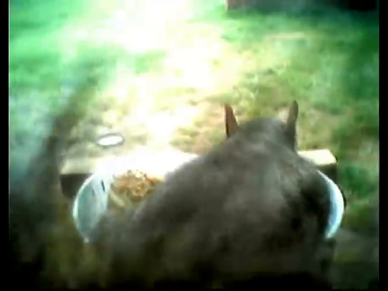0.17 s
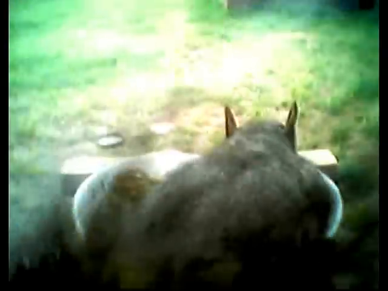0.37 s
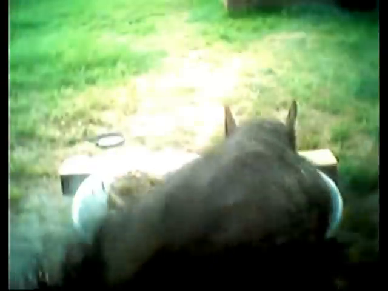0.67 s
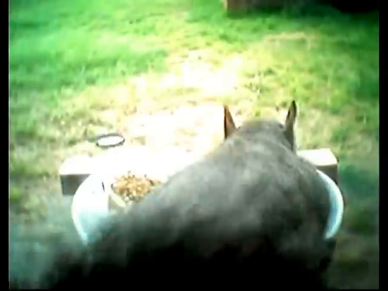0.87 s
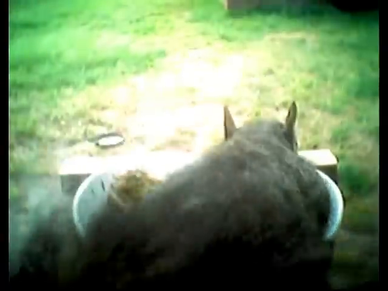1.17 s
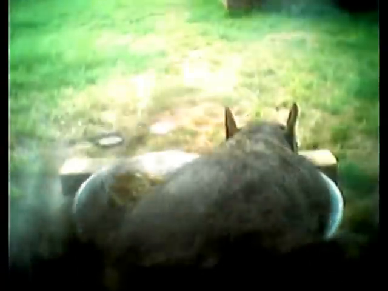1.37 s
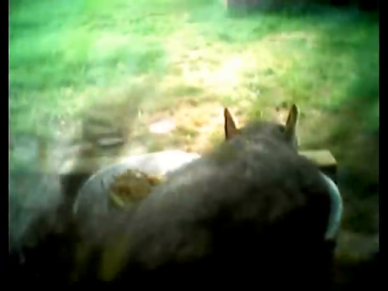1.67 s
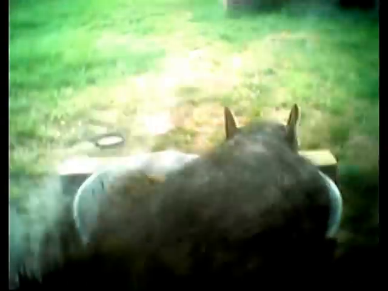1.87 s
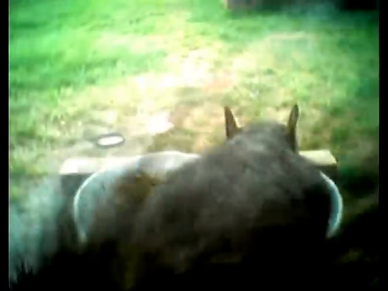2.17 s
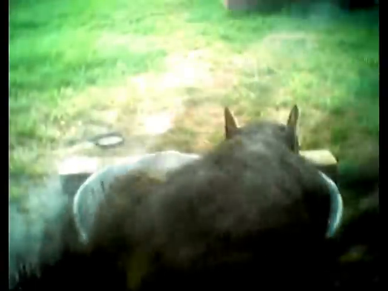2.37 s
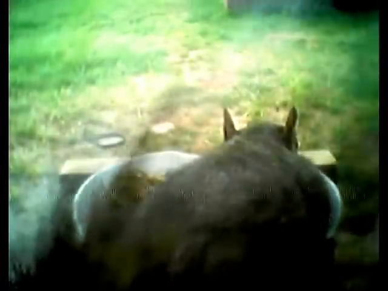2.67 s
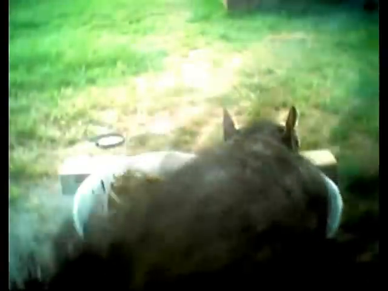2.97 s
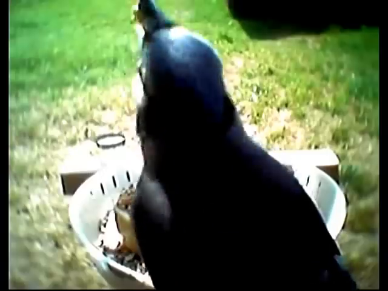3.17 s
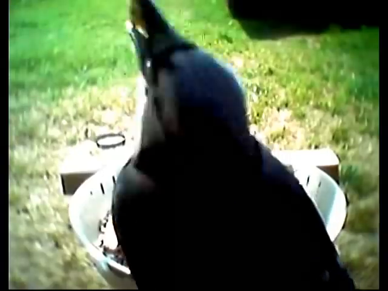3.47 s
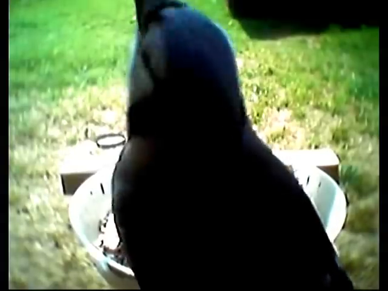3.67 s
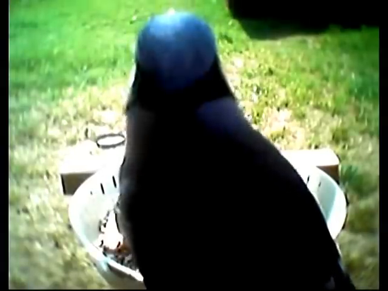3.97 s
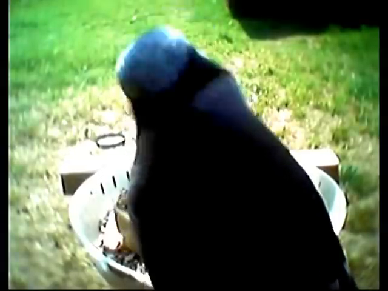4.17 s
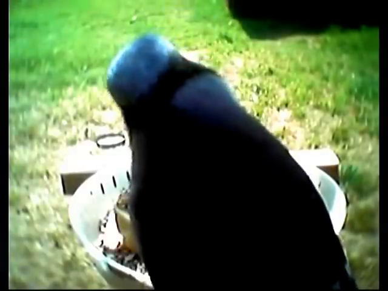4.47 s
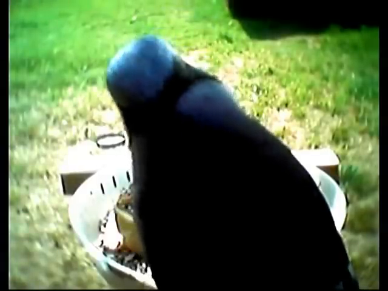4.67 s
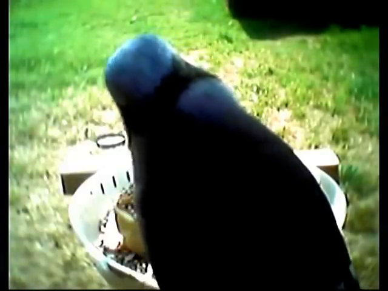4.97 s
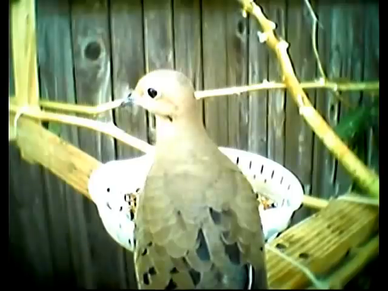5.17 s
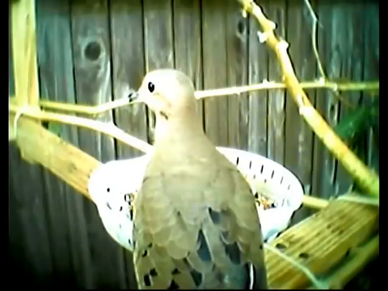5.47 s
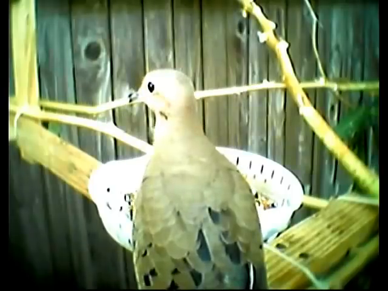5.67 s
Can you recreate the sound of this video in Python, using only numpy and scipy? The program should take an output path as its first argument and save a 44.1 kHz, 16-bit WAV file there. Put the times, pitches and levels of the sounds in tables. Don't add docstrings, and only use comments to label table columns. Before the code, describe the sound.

Outdoors in a yard, a songbird whistles falling-then-rising pairs about three times a second, with faint peeps behind it. After a tiny silent gap a nearer bird calls loudly, overloading the cheap microphone and echoing off walls. A last cut leaves only dim peeps. Birds and airy wash sit left; buzz and hiss sit right.

```python
import sys
import numpy as np
from scipy import signal
from scipy.fft import rfft, irfft
from scipy.io import wavfile
from scipy.ndimage import uniform_filter1d

SR = 44100
rng = np.random.default_rng(int(sys.argv[2]) if len(sys.argv) > 2 else 0)


def invert_db(x):
    u = np.asarray(x, float) / 20
    return 10 ** u


def dump_mix(stems):
    frames = np.atleast_2d(stems).T
    limited = np.clip(frames, -1, 1)
    pcm = np.round(limited * 32767).astype(np.int16)
    wavfile.write(sys.argv[1], SR, pcm)


N = 256220
T = np.arange(N) / SR

# start_s, end_s, fade_s, wash_db, rumble_db, hiss_db
SHOTS = [
    (-.1, 3.05, .012, -46, -59.5, -60.5),
    (3.098, 5.158, 0.019, -46.5, -59.5, -61),
    (5.203, 5.6, 0.029, -46.5, -48.5, -70),
]


def unit(x):
    return x / np.sqrt(np.mean(x ** 2))


def colour(x, shape):
    hz, db = np.transpose(shape)
    f = np.maximum(np.arange(len(x) // 2 + 1) * SR / len(x), 1)
    gain = invert_db(np.interp(np.log(f), np.log(hz), db))
    return irfft(rfft(x) * gain, len(x))


def walk(rate_hz):
    hold = int(SR / rate_hz)
    levels = np.repeat(rng.standard_normal(N // 20), hold)[:N]
    return unit(uniform_filter1d(uniform_filter1d(levels, hold), hold))


def shot_gate(start_s, end_s, fade_s):
    return np.clip(np.minimum(T - start_s, end_s - T) / fade_s + .5, 0, 1) ** 2


def flickering_noise(shape, flicker_db):
    out, noise = 0, colour(rng.standard_normal(N), shape)
    for octave in range(10):
        hz = 25 * 2. ** octave
        band = [(hz / 2, -40), (hz / 1.3, -2), (hz * 1.3, -2), (hz * 2, -40)]
        out = out + invert_db(flicker_db * walk(12)) * colour(noise, band)
    return unit(out)


def distant_wash():
    # pitch_hz, level_db (per Hz)
    wash_colour = [(30, -7), (90, -1.5), (200, -3), (400, 0), (800, -2.5), (1600, -6), (2200, 1),
                   (2700, -8), (3400, -18), (4000, -21.5), (5500, -25), (7500, -27), (11000, -29.5)]
    return flickering_noise(wash_colour, 1.36)


def low_rumble():
    rumble_colour = [(120, -22.5), (250, 9.5), (360, -4), (480, 8), (700, -38)]
    return unit(colour(rng.standard_normal(N), rumble_colour))


def input_hiss():
    # pitch_hz, level_db (per Hz)
    hiss_colour = [(25, -2), (90, -5.5), (200, -3.5), (400, 0.5), (800, -3), (2200, -17), (4000, -14),
                   (7500, -24), (11000, -24.5)]
    return flickering_noise(hiss_colour, 1.4)


def picture_buzz(field, first_s):
    field_hz = 59.94
    share, millivolts = np.transpose(field)
    wave = np.interp((T - first_s) * field_hz % 1, share, millivolts) / 1000
    dulled = colour(wave - wave.mean(), [(2000, 0), (5000, -5.0), (11000, -5.5)])
    return dulled * invert_db(1.0 * walk(3))


def signal_dropouts():
    # start_s, step_size (full scale = 1), length_s, channel (0 left, 1 right)
    dropouts = [
        (4.5469, -.16, .0018, 0),
        (4.5148, .022, .002, 1),
        (1.66, .004, .0003, 1),
    ]
    out, roughness = np.zeros((2, N)), 1 + 0.27 * rng.standard_normal(N)
    for s, size, length, channel in dropouts:
        slide_back = np.clip(1.6 - 1.46 * (T - s) / length, 0, 1)
        out[channel] += size * roughness * (T > s) * slide_back
    return out


def beak_ticks():
    # start_s, peak_db, pitch_hz
    knocks = [
        (1.099, -40, 2010),
        (1.812, -24, 2050),
        (1.877, -25, 2200),
        (3.721, -23, 2340),
        (5.289, -35.5, 1500),
    ]
    out = np.zeros(N)
    for s, db, hz in knocks:
        t = np.maximum(T - s, 0)
        out += invert_db(db) * np.exp(-t / 0.0011) * np.sin(2 * np.pi * hz * t)
    return out


def yard(x, slaps, early_db, early_t60, late_db, late_t60):
    # pitch_hz, level_db
    echo_colour = [(1400, -15), (2200, -2.5), (2700, 2), (3300, -3.5), (4500, -15.5)]
    t, noise = T[:SR], rng.standard_normal((2, SR))
    sparse = noise[0] * (rng.random(SR) < .01) * (t > .006) * invert_db(-60 * t / early_t60)
    tail = noise[1] * np.minimum(t / 0.03, 1) * invert_db(-60 * t / late_t60)
    response = (invert_db(early_db) * unit(sparse) + invert_db(late_db) * unit(tail)) / np.sqrt(SR)
    for s, db in slaps:
        response[int(s * SR)] += invert_db(db)
    return x + colour(signal.fftconvolve(x, response)[:N], echo_colour)


def echo_cancelling():
    # centre_s, depth_db
    dips = [(.064, -14), (0.0847, -10), (.383, -9), (.392, -7), (.754, -12), (1.117, -10), (1.4727, -16),
            (1.498, -12), (1.826, -25), (1.8468, -17), (2.21, -20), (2.5843, -27), (2.888, -24),
            (3.11, -20), (3.142, -18), (3.2166, -10), (3.2606, -18), (3.2677, -18), (3.8518, -17),
            (3.927, -14), (3.991, -16), (4.04, -9), (4.325, -11.5), (4.4006, -13.5), (4.5062, -15),
            (4.527, -8)]
    gain, half_width_s = np.ones(N), .002
    for s, db in dips:
        gain *= 1 - (1 - invert_db(db)) * np.exp(-((T - s) / half_width_s) ** 2)
    return gain


def whistle(notes, edge_s, wobble, flutter_db):
    out, quaver, flutter = np.zeros(N), 1 + wobble * walk(150), invert_db(flutter_db * walk(110))
    for note in notes:
        s, hz, db = np.transpose(note)
        phase = 2 * np.pi * np.cumsum(np.interp(T, s, hz) * quaver) / SR
        out += shot_gate(s[0], s[-1], edge_s) * invert_db(np.interp(T, s, db)) * np.sin(phase)
    return 2 * np.sqrt(2) * flutter * out


def peep(s, length, from_hz, to_hz, db):
    edge_db = db - 4.5
    return [(s, from_hz, edge_db),
            (s + length / 2, (from_hz + to_hz) / 2, db),
            (s + length, to_hz, edge_db)]


def far_bird():
    # start_s, length_s, from_hz, to_hz, level_db
    low_peeps = [
        (.21, .045, 2100, 1850, -46),
        (0.269, 0.087, 2425, 2384, -54),
        (.55, .05, 2450, 2053, -50),
        (.6, 0.092, 2250, 1897, -52),
        (5.268, 0.0305, 2197, 1900, -53),
        (5.36, 0.086, 2200, 2100, -57),
    ]
    # start_s, length_s, from_hz, to_hz, level_db
    high_peeps = [
        (4.095, .018, 3000, 2900, -48),
        (4.138, 0.022, 2950, 2950, -51),
    ]
    direct = whistle([peep(*row) for row in low_peeps + high_peeps], .02, .045, 6)
    return yard(direct, [], 2, 0.13, 0, 0.55) - 0.8 * direct


def fall(s, length, top_hz, bottom_hz, db):
    flick_s, flick_hz = .007, 380
    turn, done = .5, .82
    return [(s, top_hz - flick_hz, db - 20),
            (s + flick_s, top_hz, db - 9.5),
            (s + turn * length, top_hz - done * (top_hz - bottom_hz), db),
            (s + .88 * length, bottom_hz, db - 4.5),
            (s + length, bottom_hz, db - 16.5)]


def rise(s, length, top_hz, db):
    from_hz, droop_hz = 2780, 50
    swell, top = 0.31, .82
    return [(s, from_hz, db - 12),
            (s + swell * length, from_hz + swell / top * (top_hz - from_hz), db - 3.5),
            (s + top * length, top_hz, db),
            (s + length, top_hz - droop_hz, db - 7.5)]


def songbird():
    # start_s, length_s, top_hz, bottom_hz, level_db
    falls = [(.04, .06, 2737, 2229, -28), (0.375, .052, 2604, 2196, -30), (.712, .068, 2776, 2220, -33),
             (1.098, .062, 2710, 2298, -34), (1.453, .066, 3040, 2186, -28), (1.809, .055, 2757, 2181, -30),
             (2.176, .068, 2956, 2138, -34), (2.541, .062, 2640, 2170, -33), (2.871, .055, 2720, 2250, -35)]
    # start_s, length_s, top_hz, level_db
    rises = [(0.124, .088, 3250, -47), (0.446, 0.086, 3260, -44), (0.794, 0.079, 3235, -49.5),
             (1.169, 0.096, 3200, -46.5), (1.526, 0.087, 3440, -47), (1.874, 0.088, 3247, -42.5),
             (2.236, .095, 3215, -46.5), (2.61, 0.081, 3196, -45.5), (2.944, 0.098, 3220, -46)]
    # delay_s, level_db
    slaps = [
        (.022, -17),
        (.045, -19),
    ]
    notes = [fall(*row) for row in falls] + [rise(*row) for row in rises]
    return yard(whistle(notes, 0.0063, .011, 2.77), slaps, -3.5, 0.16, -9, 0.71)


def near_bird():
    # time_s, pitch_hz, level_db
    cut_call = [(3.1, 2130, -35.5), (3.122, 2245, -34), (3.13, 2260, -45)]
    rising_call = [(3.118, 1830, -42.5), (3.154, 2039, -30.5), (3.169, 2030, -31), (3.181, 2144, -26),
                   (3.203, 2182, -25.5), (3.211, 2164, -33.5)]
    falling_call = [(3.82, 2400, -48.5), (3.846, 2190, -36.5), (3.856, 2344, -41), (3.866, 2260, -29.5),
                    (3.899, 2171, -33.5), (3.927, 2121, -45.5), (3.945, 2208, -28.5), (3.964, 2101, -36.5),
                    (3.98, 2124, -42.5)]
    dipping_call = [(4.005, 2100, -46), (4.018, 1960, -35), (4.056, 1994, -35.5), (4.098, 2174, -27.5),
                    (4.11, 2054, -37), (4.132, 2144, -40), (4.16, 2183, -48)]
    slurred_call = [(4.245, 2337, -51), (4.259, 2817, -35.5), (4.287, 2209, -26.5), (4.303, 2220, -26),
                    (4.341, 2095, -30.5), (4.362, 2250, -25.5), (4.402, 2046, -38), (4.464, 2000, -32),
                    (4.52, 2024, -39)]
    # delay_s, level_db
    slaps = [
        (.042, -6),
        (.027, -11),
        (.061, -10),
        (.084, -14),
        (.11, -18),
        (.14, -17),
    ]
    calls = [cut_call, rising_call, falling_call, dipping_call, slurred_call]
    return yard(whistle(calls, 0.0043, 0.012, 1.2), slaps, -3.5, 0.27, -11, 0.9)


def scene():
    fields = [
        [(0, -10), (.06, -16), (.37, 9), (.55, 1.5), (.65, 4.5), (.915, 3), (.92, 1.5), (1, 4.5)],
        [(0, -11), (.1, -12), (.25, -9.5), (.42, 6), (.5, 6.5), (.6, 3.5), (.915, 5), (.92, 2.5), (1, 3)],
        [(0, 4), (.06, -2.5), (.34, 4), (.44, 0.5), (.5, -0.5), (.62, -3), (.8, -2), (.915, -0.5), (.92, 6.5),
         (1, 3.5)],
    ]
    first_fields = [
        .0042,
        .009,
        .0103,
    ]
    air, rumble, hiss = distant_wash(), low_rumble(), input_hiss()
    click, far, cancel = beak_ticks(), far_bird(), echo_cancelling()
    main_birds = [songbird(), near_bird(), np.zeros(N)]
    out = np.zeros((2, N))
    for shot, field, first_s, bird in zip(SHOTS, fields, first_fields, main_birds):
        start, end, fade, wash_db, rumble_db, hiss_db = shot
        gate = shot_gate(start, end, fade)
        buzz = picture_buzz(field, first_s)
        background = invert_db(wash_db) * air + invert_db(rumble_db) * rumble + invert_db(-26) * buzz
        out[0] += gate * (cancel * bird + far + click + background)
        out[1] += gate * (buzz + invert_db(hiss_db) * hiss)
    return out + signal_dropouts()


def thin_treble(x):
    from_hz, quiet_db, budget_db = 3300, 8.7, 1.2
    mask_db, mask_db_per_khz = -46, -5
    hz, s, z = signal.stft(x, SR, nperseg=1536)
    size, high = np.abs(z) + 1e-12, hz > from_hz
    usual = np.median(size[:, high & (hz < 11000)], axis=(1, 2), keepdims=True)
    loudest = size[:, hz > 1000].max(axis=1, keepdims=True)
    hidden = loudest * invert_db(mask_db + mask_db_per_khz * (hz[:, None] - from_hz) / 1000)
    step = (invert_db(quiet_db) * usual + hidden) * invert_db(budget_db * rng.standard_normal(len(s)))
    rounded = np.floor(size / step + .42) * step / size
    kept = np.where(high[:, None], rounded, 1)
    return signal.istft(z * kept, SR, nperseg=1536)[1][:, :N]


def low_pass(x):
    return signal.sosfilt(signal.butter(12, 11150, fs=SR, output="sos"), x)


def record(dry):
    lopsided = np.where(T < SHOTS[1][0], .5, 1.5)
    x = dry - lopsided * dry ** 2 - 1.9 * dry ** 3
    x = signal.sosfilt(signal.butter(1, 15, "high", fs=SR, output="sos"), x)
    x = signal.sosfilt(signal.ellip(8, .2, 60, 11300, fs=SR, output="sos"), x)
    finished = thin_treble(x)
    return low_pass(finished)


dry = scene()
out = record(dry)
dump_mix(out)
```